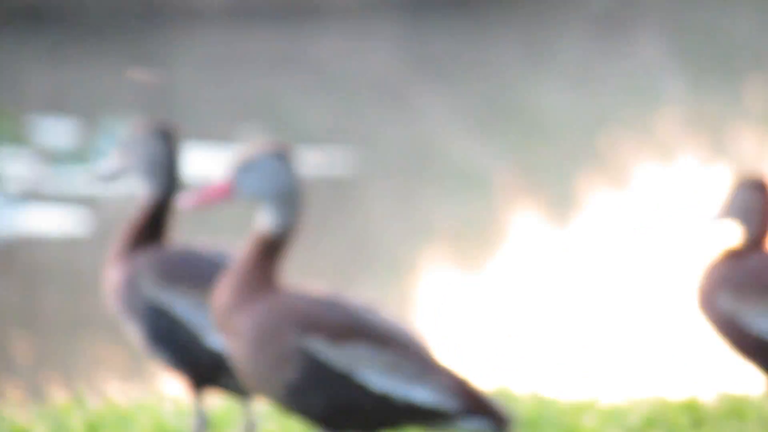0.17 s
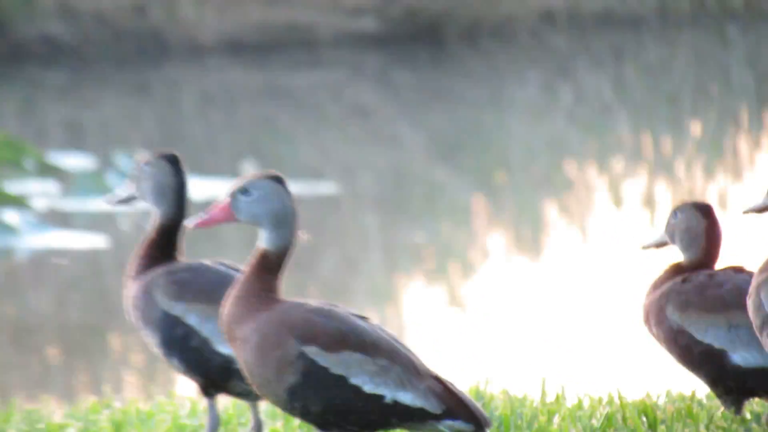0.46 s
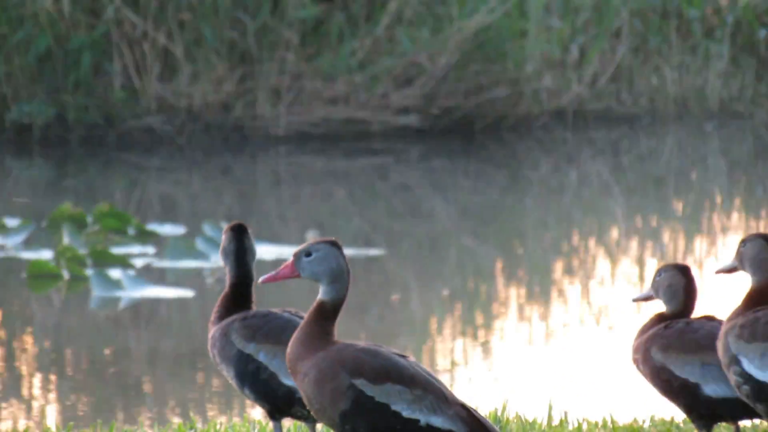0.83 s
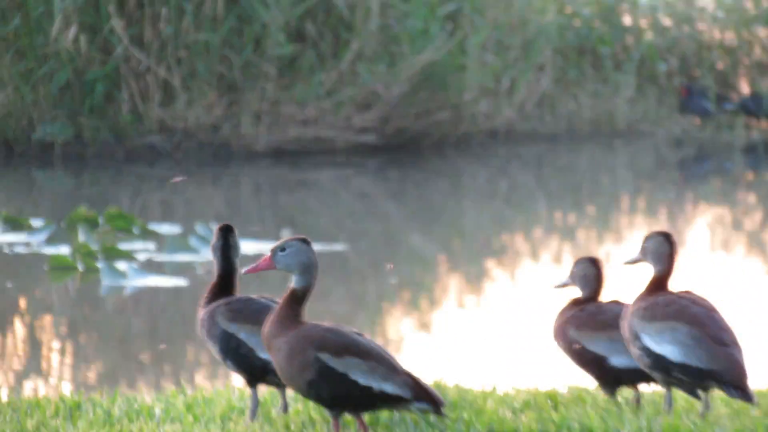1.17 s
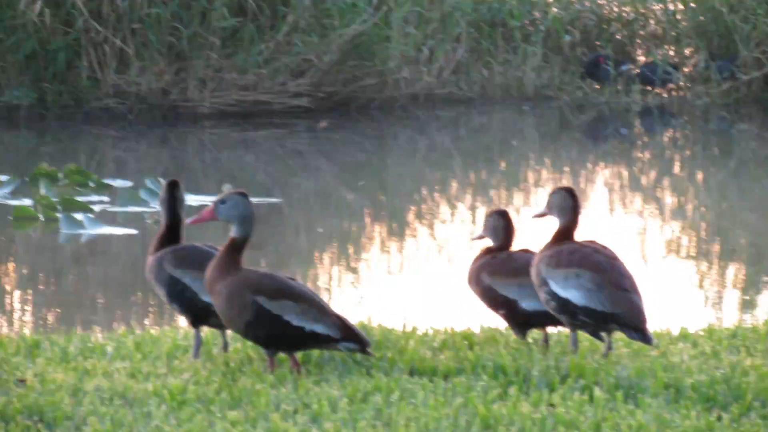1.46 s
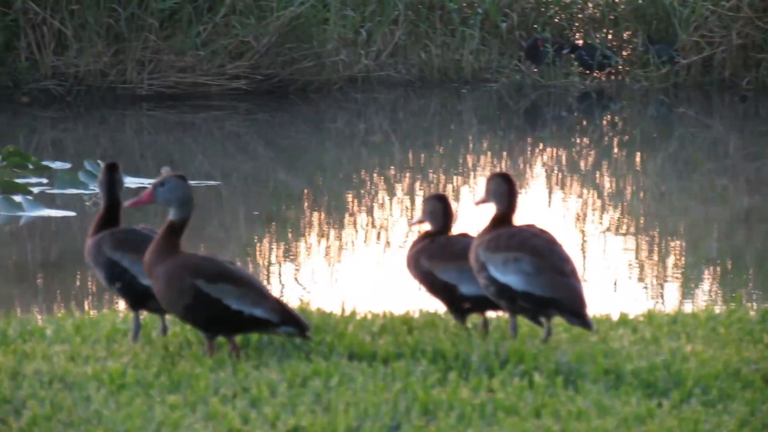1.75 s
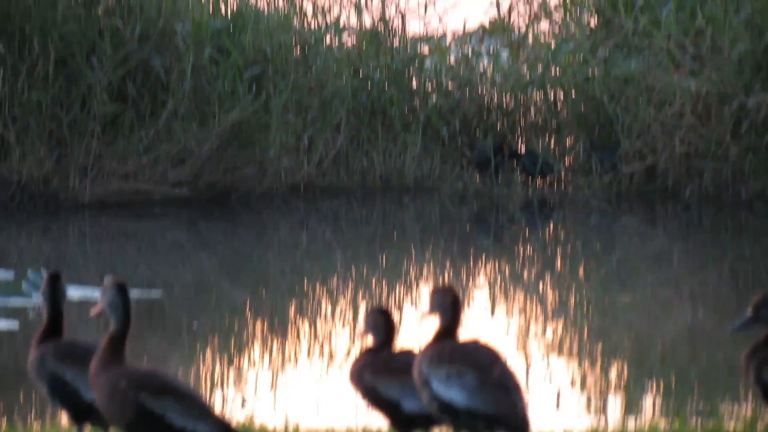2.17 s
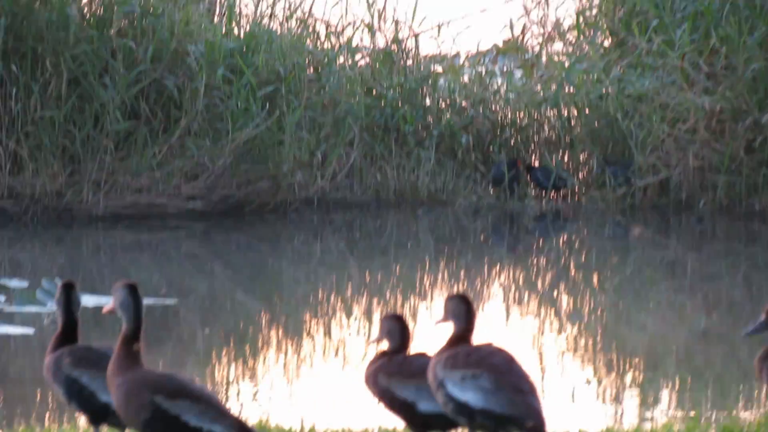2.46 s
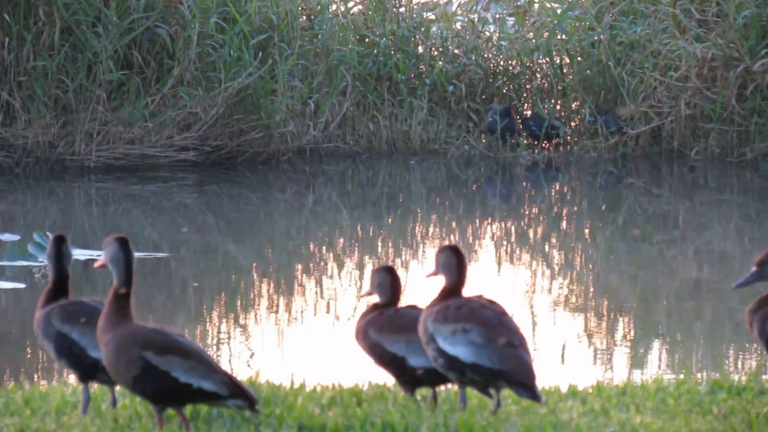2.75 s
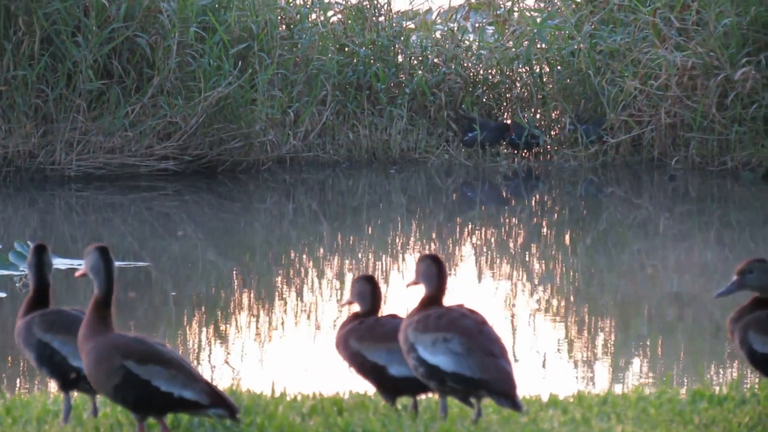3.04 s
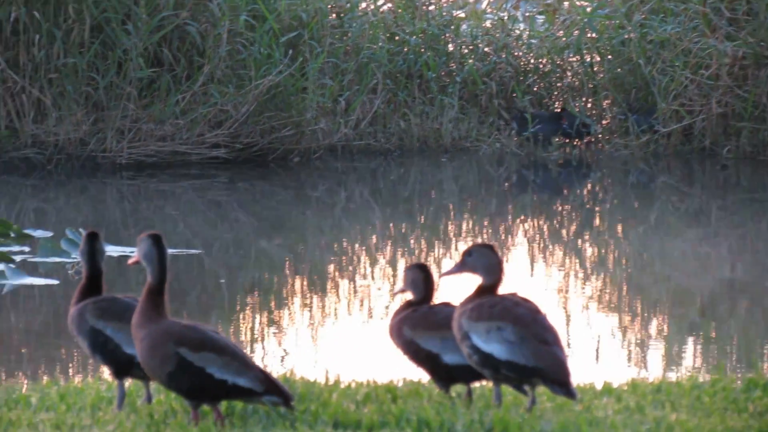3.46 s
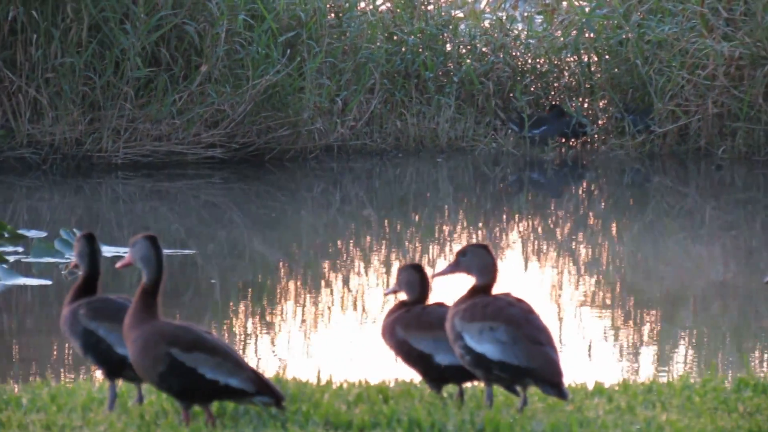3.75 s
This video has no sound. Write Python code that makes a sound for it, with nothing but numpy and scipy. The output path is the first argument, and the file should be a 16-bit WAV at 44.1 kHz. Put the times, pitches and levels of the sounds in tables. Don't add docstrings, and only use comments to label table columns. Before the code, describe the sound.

Whistling ducks on a pond bank twitter softly, then whistle high and loud toward the end, mostly at the right; distant traffic rumbles, and the camera's zoom motor hisses early amid close handling clicks.

```python
import sys
import numpy as np
from scipy import signal
from scipy.fft import rfft, irfft
from scipy.io import wavfile
from scipy.ndimage import uniform_filter1d

SR = 44100
rng = np.random.default_rng(int(sys.argv[2]) if len(sys.argv) > 2 else 0)


def to_linear_factor(level_db):
    exponent = np.asarray(level_db, float) / 20
    return 10 ** exponent


def wav_out(sig):
    wavfile.write(sys.argv[1], SR, np.round(np.clip(np.atleast_2d(sig).T, -1, 1) * 32767).astype(np.int16))


N = 172431

# frequency_hz, density_db (per Hz)
TRAFFIC_SPECTRUM = [(30, -34), (92, 1.5), (210, -11), (400, -18.5), (900, -12.5), (2270, -36),
                    (3300, -40.5), (15000, -53)]
# time_s, level_db
TRAFFIC_LEVEL = [(0, -37.5), (1.2, -33.5), (3.9, -34)]
# frequency_hz, likeness (0 to 1)
PORT_LIKENESS = [(100, 0.96), (400, 0.55), (8000, 0.033)]
# frequency_hz, density_db (per Hz)
MOTOR_SPECTRUM = [(1500, -1.5), (5000, -12), (9500, -16.5), (11300, -16.5), (15500, -31)]
# time_s, level_db
MOTOR_LEVEL = [(.132, -52), (1.1, -43.5), (1.455, -44)]
# start_s, low_ring_db, high_ring_db
CLICKS = [
    (0.0405, -25, -23),
    (1.303, -31, -33),
    (1.348, -32, -44),
    (1.4567, -25, -32),
    (2.312, -35, -46),
    (2.3404, -20, -30),
    (2.452, -36, -36),
    (2.6726, -19, -18),
]
# frequency_hz, gain_db
LEFT_SHADE = [(2000, -15), (3300, -13), (5500, 0.5), (10000, 0.5)]
# frequency_hz, phase_rad
PORT_PHASE = [(300, 0), (1460, 1.46), (2580, 6), (5000, 7)]

# start_s, length_s, level_db, top_pitch_hz
STEADY_NOTES = [(0.865, 0.026, -45, 2656), (0.954, 0.034, -43, 2674), (1.04, 0.031, -41, 2630),
                (1.129, 0.031, -41, 2594), (1.205, 0.03, -41.5, 2575), (1.294, 0.032, -43, 2523),
                (1.381, 0.026, -47, 2476), (3.108, 0.036, -42.5, 2553)]
PEEPER_NOTES = [(0.196, 0.036, -52, 3280), (0.297, 0.029, -50, 3120), (0.502, 0.045, -45.5, 3830),
                (0.657, 0.037, -54, 3630), (0.873, 0.043, -45, 3570), (1.103, 0.052, -44.5, 4150),
                (1.214, 0.042, -39.5, 3530), (1.343, 0.057, -46, 3900), (1.454, 0.045, -43.5, 4030),
                (1.575, 0.044, -43.5, 4060), (1.7, 0.049, -45, 4050), (1.81, 0.047, -44.5, 4000),
                (1.925, 0.045, -44, 3990), (2.033, 0.051, -45.5, 4100), (2.08, 0.043, -40.5, 3760),
                (2.13, 0.027, -51, 3830), (2.794, 0.031, -43.5, 3740), (3.245, 0.035, -43.5, 3810),
                (3.839, 0.036, -30, 3527)]
REEDY_NOTES = [(1.636, 0.05, -52, 1890), (1.745, 0.042, -52, 1874), (1.85, 0.057, -53, 1890),
               (1.96, 0.051, -54, 1865), (2.369, 0.043, -51, 1995)]
REEDY_UP_NOTES = [(0.07, 0.044, -59.5, 2340), (1.526, 0.061, -59, 2080), (2.456, 0.088, -52, 2256)]
YOUNG_NOTES = [(0.154, 0.027, -55.5, 2600), (0.281, 0.028, -55.5, 2600), (0.404, 0.03, -55.5, 2590),
               (0.527, 0.024, -56, 2510), (0.647, 0.02, -56, 2470)]
FAR_NOTES = [(0.073, 0.029, -60, 2870), (0.308, 0.02, -57, 3190), (0.565, 0.021, -56, 3020),
             (0.635, 0.023, -58.5, 2730), (0.649, 0.04, -60.5, 3066), (0.728, 0.018, -59, 3530),
             (0.749, 0.055, -59, 3120), (0.838, 0.021, -55, 3100), (0.929, 0.026, -57, 3200),
             (0.935, 0.025, -64, 4250), (1.12, .02, -55, 3090), (1.026, 0.04, -58, 3195),
             (1.143, 0.052, -53, 3340), (1.305, 0.023, -52.5, 3190), (1.409, 0.02, -52, 3240),
             (2.892, 0.018, -53, 4120), (3.561, 0.021, -52, 3350), (3.58, 0.025, -49, 2740)]
NEAR_NOTES = [(2.51, 0.035, -40.5, 3340), (2.596, 0.034, -31.5, 3420), (2.776, 0.02, -31, 3206),
              (2.858, 0.034, -34, 3315), (2.894, 0.024, -36, 3350), (3.112, 0.0284, -35, 3086),
              (2.976, 0.027, -34.5, 3480), (3.057, 0.013, -33, 2990), (3.065, 0.029, -38, 3500),
              (3.16, 0.027, -34, 3580), (3.648, 0.027, -32, 3570), (3.742, 0.028, -30, 3494),
              (3.832, 0.015, -29.5, 3716)]
RISER_NOTES = [(3.355, 0.046, -35.5, 5090), (3.588, 0.047, -34.5, 5200), (3.2, 0.04, -34, 5050),
               (3.555, 0.035, -48, 2300)]
FALLER_NOTES = [(.99, 0.032, -47, 4940), (3.52, 0.04, -46.5, 6000), (3.69, 0.015, -47, 5570),
                (3.83, 0.0156, -45, 4700), (0.77, 0.017, -53, 4020), (2.9, 0.022, -52, 2900)]
# top_place (share of length), sag_per_s2 (pitch sag), tone_1_db, tone_2_db, tone_3_db
VOICES = [
    (0.79, 150, 4.5, 1, -15),
    (.47, 1150, 1, -24, -36),
    (-0.3, 45, -28, 3.5, -3),
    (.72, 70, -3, 5.5, 0),
    (0.25, 400, 0, 5.5, 0),
    (.4, 79, 13.5, 1, -14),
    (0.79, 150, 1.5, -18, -27),
    (1.45, 166, -1.5, -28, -49),
    (-0.45, 300, 1.5, -32, -45),
]

# time_s, pitch_hz, level_db
DIP = [(2.493, 3070, -51.5), (2.555, 2900, -46), (2.577, 3460, -41.5), (2.597, 3270, -47)]
HOOK = [(2.625, 3012, -45), (2.651, 3415, -40), (2.672, 2830, -41)]
ARCH = [(2.617, 2396, -54), (2.647, 2854, -50.5), (2.668, 2580, -44)]
LIFT = [(2.684, 3092, -30), (2.716, 3500, -42.5), (2.736, 3050, -69)]
STAIRS = [(2.868, 1897, -60), (2.89, 2390, -47), (3.076, 3006, -48), (3.13, 2930, -44.5),
          (3.146, 2590, -46), (3.158, 2021, -67)]
CLIMB = [(2.933, 3050, -40), (2.941, 3067, -33.5), (2.969, 3114, -36.5), (3.087, 4006, -39),
         (3.14, 4070, -46.5)]
THIN = [(2.935, 2400, -61), (3.05, 2550, -54), (3.08, 2550, -55), (3.134, 2550, -62)]
BOW = [(3.195, 2455, -39), (3.241, 2900, -39), (3.292, 2480, -42.5)]
LONG = [(3.352, 2626, -52), (3.392, 3198, -33), (3.5, 3276, -33), (3.52, 2970, -32.5), (3.538, 2380, -52)]
SECOND = [(3.6, 3025, -49), (3.648, 3396, -31.5), (3.7, 2563, -41.5)]
THIRD = [(3.77, 2860, -45), (3.798, 3256, -32.5), (3.84, 2526, -39)]
# tone_1_db, tone_2_db, tone_3_db
WHISTLE_TONES = [(6.5, -22, -26), (6.5, -13, -29), (3, 5.5, -9), (5, -13, -19), (4.5, 1.5, -12.5),
                 (4, -15.5, -22), (-18, 5.5, -21), (4, -5.5, -15), (4, -17, -22), (4.5, -13.5, -19),
                 (2.5, -14.5, -20.5)]


def read(points, x, log=True):
    a, value = np.transpose(points)
    if log:
        return np.interp(np.log(x + 1), np.log(a + 1), value)
    return np.interp(x, a, value)


def add(mix, s, sound):
    part = mix[round(s * SR):][:len(sound)]
    part += sound[:len(part)]


def shaped(x, gain):
    return irfft(rfft(x) * gain(np.fft.rfftfreq(N, 1 / SR)), N)


def hiss(spectrum, patchy_db):
    hz = np.fft.rfftfreq(1024, 1 / SR)
    a, b, c, d, patch = rng.standard_normal((N // 256 + 5, 513, 5)).T
    patch = uniform_filter1d(uniform_filter1d(patch, size=10, axis=0), size=12, axis=1)
    same = np.clip(read(PORT_LIKENESS, hz), 0, 1)[:, None]
    left = a + 1j * b
    right = same * left + np.sqrt(1 - same ** 2) * (c + 1j * d)
    level_db = read(spectrum, hz)[:, None] + patchy_db * patch / patch.std()
    x = signal.istft(np.array([left, right]) * to_linear_factor(level_db), nperseg=1024, noverlap=768)[1][:, :N]
    return x / x.std()


def traffic():
    return hiss(TRAFFIC_SPECTRUM, 0.8) * to_linear_factor(read(TRAFFIC_LEVEL, np.arange(N) / SR, False))


def lens_motor():
    t = np.arange(N) / SR
    running = (t > MOTOR_LEVEL[0][0]) & (t < MOTOR_LEVEL[-1][0])
    return hiss(MOTOR_SPECTRUM, 1) * to_linear_factor(read(MOTOR_LEVEL, t, False)) * running


def body_clicks():
    out, rock, t = np.zeros(N), np.zeros(N), np.arange(1500) / SR
    click_t60_s, tick_db = 0.014, -19
    rock_hz, rock_db, rock_s = 1050, 1, 0.002
    for s, *rings_db in CLICKS:
        db = max(rings_db)
        modes = zip(rings_db, (1740, 2350))
        ring = sum(to_linear_factor(g - db) * np.sin(2 * np.pi * hz * t) for g, hz in modes)
        tick = to_linear_factor(tick_db) * uniform_filter1d(rng.standard_normal(len(t)), size=3)
        add(out, s, to_linear_factor(db - 60 * t / click_t60_s) * (ring * np.minimum(t / 0.00023, 1) + tick))
        swing = t / rock_s * np.exp(1 - (t / rock_s) ** 2)
        add(rock, s, to_linear_factor(db + rock_db) * np.sin(2 * np.pi * rock_hz * t) * swing)
    add(out, CLICKS[0][0], to_linear_factor(-28 - 60 * t / 0.051) * np.sin(2 * np.pi * 654 * t))
    add(out, 0.1305, to_linear_factor(-39 - 60 * t / 0.02) * rng.standard_normal(len(t)))
    add(out, 1.92, splash(t))
    pan = to_linear_factor(np.array([[-3], [0]]))
    return out * pan + rock * np.array([[-1], [1]])


def splash(t):
    splash_hz, splash_db, t60_s = 6900, -24, 0.07
    band_pass = signal.butter(2, [splash_hz * 0.9, splash_hz * 1.1], "band", fs=SR)
    band = signal.lfilter(*band_pass, rng.standard_normal(len(t)))
    return to_linear_factor(splash_db - 60 * t / t60_s) * band * np.minimum(t / 0.008, 1)


def banks(x):
    echo_db, t60_s, first_echo_s = -5.5, 0.56, 0.008
    t = np.arange(SR // 2) / SR
    tail = rng.standard_normal((2, len(t))) * to_linear_factor(-60 * t / t60_s) * (t > first_echo_s)
    tail /= np.linalg.norm(tail[0])
    return to_linear_factor(echo_db) * signal.fftconvolve(x[None], tail, axes=1)[:, :N]


def whistle(hz, db, tones_db):
    waver, breath, flutter_db, bend_fade_db, edge_s = 0.003, 0.22, 1.5, 40, 0.006
    t = np.arange(len(hz)) / SR
    wobble = sum(np.sin(2 * np.pi * (f * t + rng.random())) for f in (37., 90.))
    smoother = np.hanning(60) / np.linalg.norm(np.hanning(60))
    air = signal.lfilter(smoother, 1, rng.standard_normal((4, len(t))))
    turn = 2 * np.pi * np.cumsum(hz * (1 + waver * wobble)) / SR
    tone = 0
    for k, g in enumerate(tones_db):
        flutter = flutter_db * wobble[::(-1) ** k]
        fade = bend_fade_db * k * (1 - hz / hz.max()) ** 2
        wave = np.sin((k + 1) * turn) + breath * air[k] * np.cos((k + 1) * turn)
        tone = tone + to_linear_factor(g + flutter - fade) * wave
    edges = np.sin(np.pi / 2 * np.clip(np.minimum(t, t[-1] - t) / edge_s, 0, 1))
    return np.sqrt(2) * to_linear_factor(db) * tone * edges


def far_chatter():
    out, t = np.zeros(N), np.arange(0, 0.03, 1 / SR)
    chatter_db, hush_s = -61, 2
    for when, pitch, place in rng.random((90, 3)):
        start = when * N / SR
        if abs(start - hush_s) > 0.5:
            hz = 2600 * (1 + pitch / 2) / (1 + 200 * (t - place * t[-1]) ** 2)
            add(out, start, whistle(hz, chatter_db + 10 * when, VOICES[1][2:]))
    return out


def short_notes():
    out = np.zeros(N)
    flock = (STEADY_NOTES, PEEPER_NOTES, REEDY_NOTES, REEDY_UP_NOTES, YOUNG_NOTES, FAR_NOTES,
             NEAR_NOTES, RISER_NOTES, FALLER_NOTES)
    for notes, (place, sag, *tones) in zip(flock, VOICES):
        for start, length, db, top_hz in notes:
            t = np.arange(0, length, 1 / SR)
            hz = top_hz / (1 + sag * (t - place * length) ** 2)
            add(out, start, whistle(hz, db, tones))
    return out


def long_whistles():
    out = np.zeros(N)
    paths = (DIP, HOOK, ARCH, LIFT, STAIRS, CLIMB, THIN, BOW, LONG, SECOND, THIRD)
    for path, tones in zip(paths, WHISTLE_TONES):
        s, hz, db = np.transpose(path)
        t = np.arange(s[0], s[-1], 1 / SR)
        lines = [np.interp(t, s, hz), np.interp(t, s, db)]
        hz, db = uniform_filter1d(lines, size=350, mode="nearest")
        add(out, s[0], whistle(hz, db, tones))
    return out


def scene():
    flock = far_chatter() + short_notes() + long_whistles()
    heard = np.array([flock, flock]) + banks(flock)
    heard[0] = shaped(heard[0], lambda hz: to_linear_factor(read(LEFT_SHADE, hz)))
    mix = traffic() + lens_motor() + heard
    mix[0] = shaped(mix[0], lambda hz: np.exp(1j * read(PORT_PHASE, hz)))
    return mix + body_clicks()


def treble_ducked(x):
    treble_hz, loud_db, duck_db_per_db = 10300, -35, 3
    top = np.array([shaped(c, lambda hz: 1. * (hz > treble_hz)) for c in x])
    calls = shaped(x[1], lambda hz: 1. * (hz > 2200))
    power = abs(uniform_filter1d(calls ** 2, size=1500))
    over_db = 10 * np.log10(power + 1e-12) - loud_db
    return x - top * (1 - to_linear_factor(-duck_db_per_db * np.maximum(over_db, 0)))


def roll_off(x):
    return signal.sosfilt(signal.butter(12, 15820, fs=SR, output="sos"), x)


def record(dry):
    start_s = 0.035
    mix = treble_ducked(dry) * (np.arange(N) > start_s * SR)
    return roll_off(mix)


dry = scene()
out = record(dry)
wav_out(out)
```